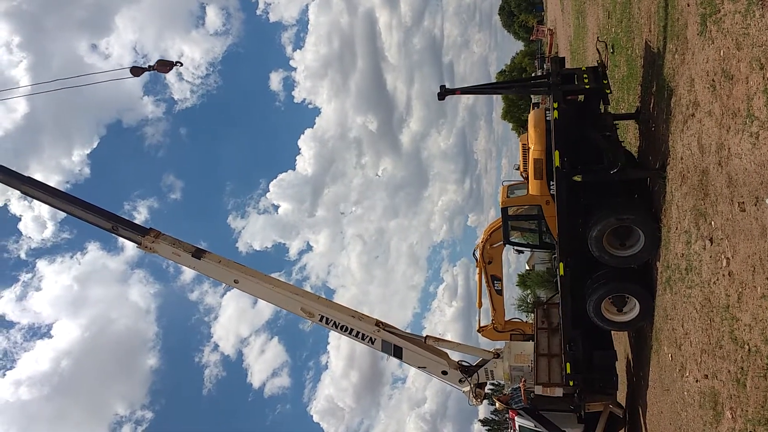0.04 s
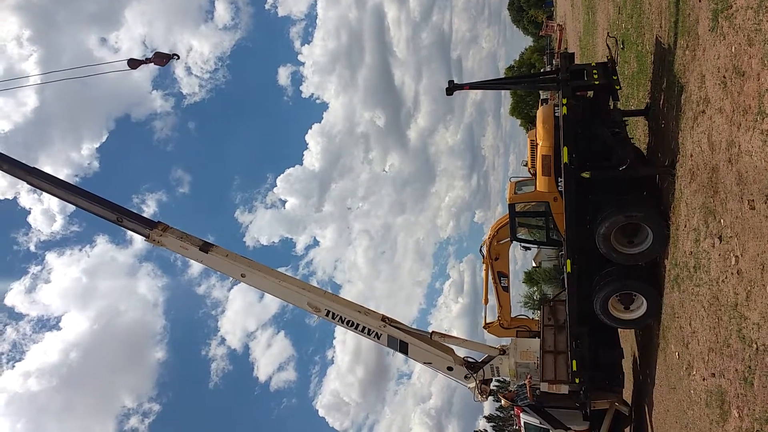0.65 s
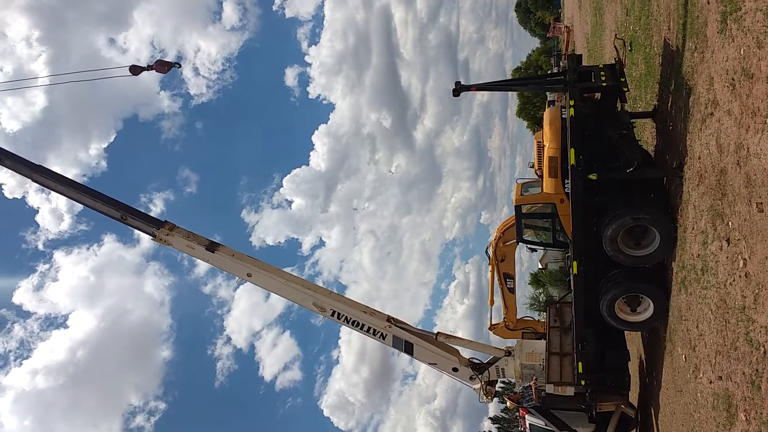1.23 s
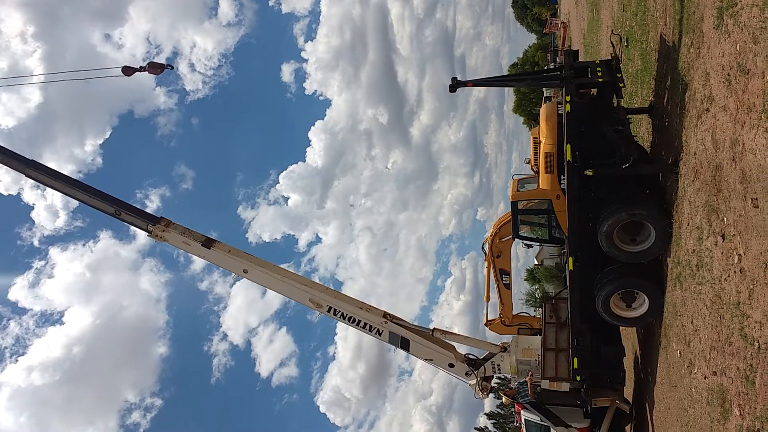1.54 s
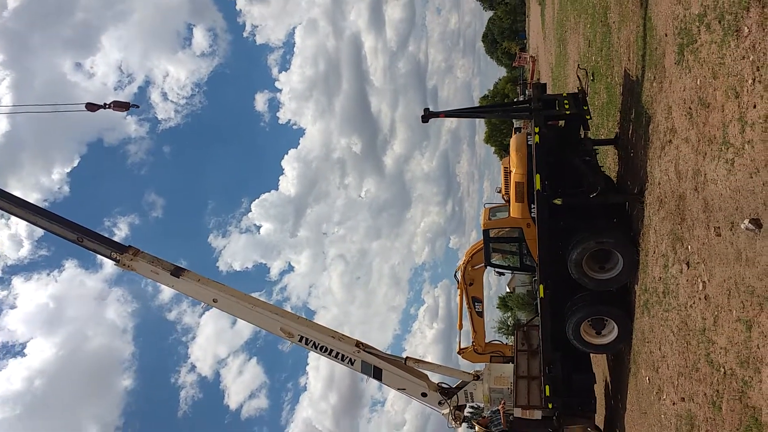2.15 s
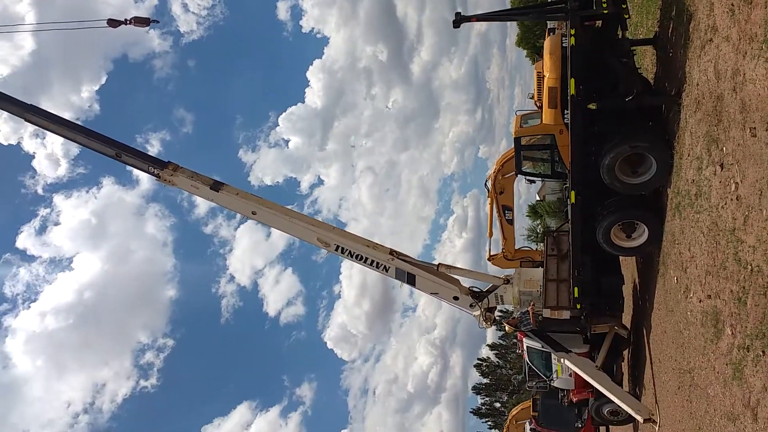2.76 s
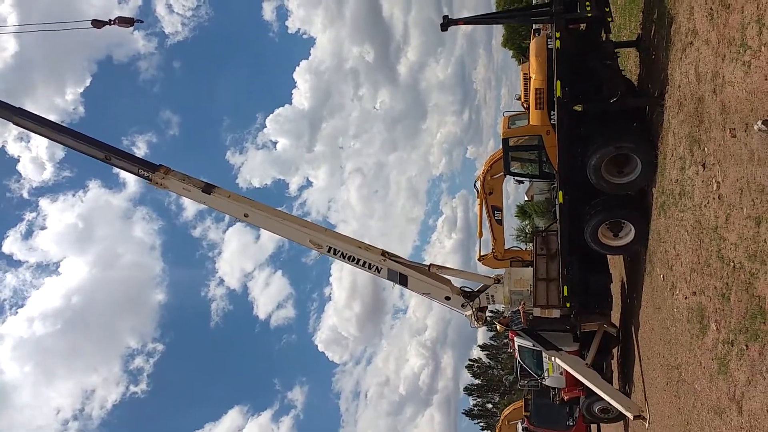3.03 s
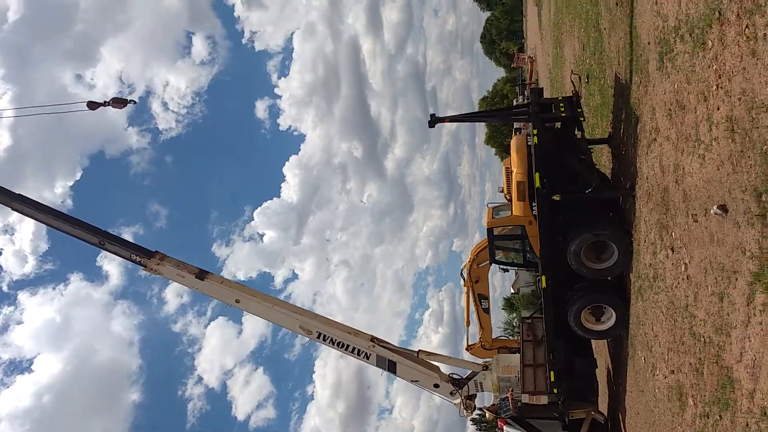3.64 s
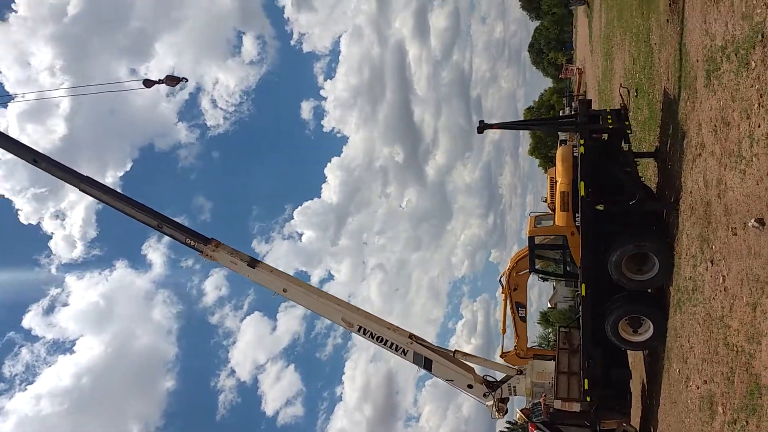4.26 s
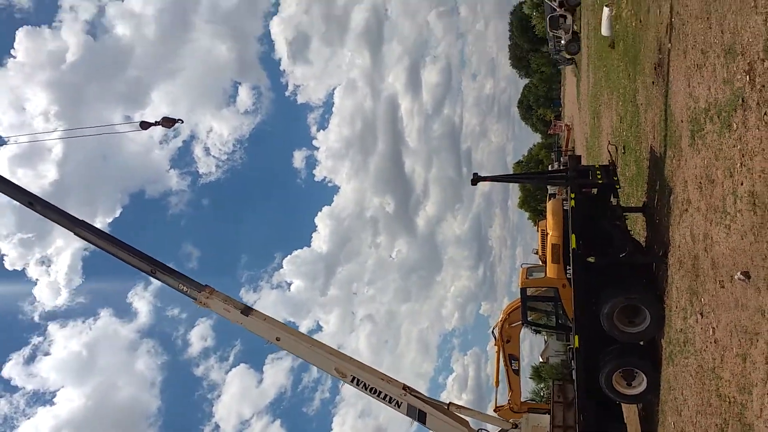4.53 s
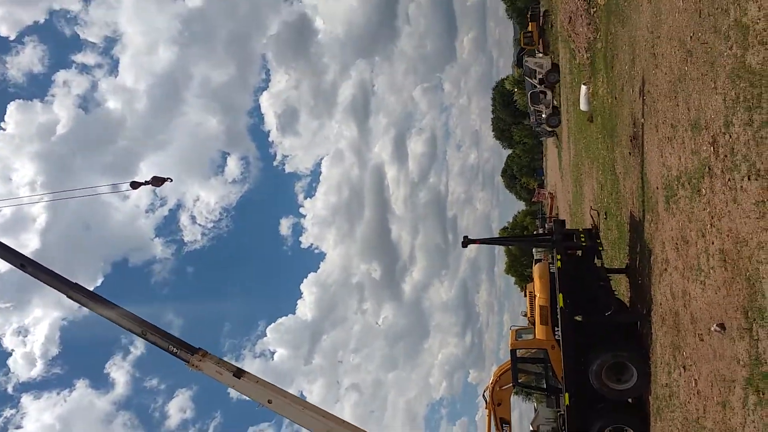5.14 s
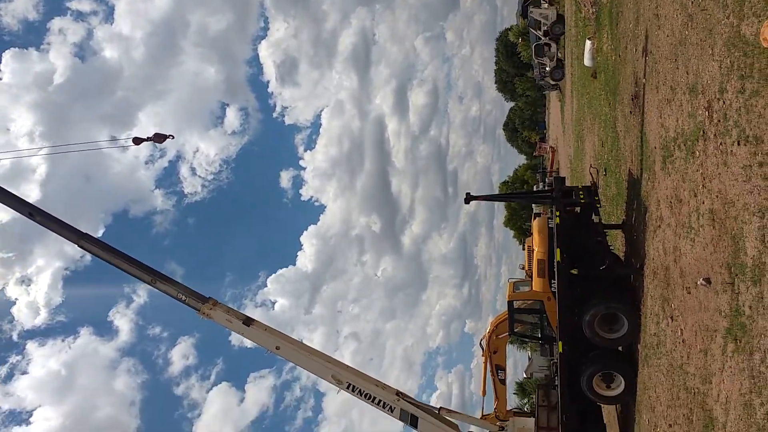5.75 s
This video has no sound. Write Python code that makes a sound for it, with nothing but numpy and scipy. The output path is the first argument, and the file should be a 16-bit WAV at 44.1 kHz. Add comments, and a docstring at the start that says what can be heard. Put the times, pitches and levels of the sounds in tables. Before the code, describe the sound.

A diesel crane truck idles outdoors with a steady rattle, a low throb and a thin pump whine. Gusts buffet the hand-held microphone, peaking after about two seconds with sharp pops, and the engine dips under the strongest ones. After four seconds a valve gives a faint, thin hiss and the hydraulic whine comes forward as the engine sags slightly. The wind keeps thumping, and one faint tick comes near the end.

```python
"""A six-cylinder diesel truck idles in a field, rattling and throbbing as it drives its crane's pump.
From the first second, gusts buffet the two ports of a hand-held microphone; the recorder's gain
control ducks the engine at each strong gust and lets it swell back. Around two seconds the microphone
turns away and the wind peaks. After four seconds a valve opens with a thin hiss, the pump takes load,
its whine comes forward and the engine sags a little. Near the end comes one faint tick."""
import sys
import numpy as np
from scipy import signal
from scipy.fft import rfft, irfft
from scipy.io import wavfile
from scipy.ndimage import uniform_filter1d, minimum_filter1d, map_coordinates

SR = 44100
rng = np.random.default_rng(int(sys.argv[2]) if len(sys.argv) > 2 else 0)


def persist_wave(psi):
    """Save psi, clipped to +-1, as 16-bit WAV."""
    counts = np.round(np.clip(psi, -1, 1) * 32767).astype(np.int16)
    wavfile.write(sys.argv[1], SR, np.atleast_2d(counts).T)


N = 255339
T, HZ = np.arange(N) / SR, np.fft.rfftfreq(N, 1 / SR)
PORT_SPAN_HZ = 2491  # the full phase shift between the ports makes one turn in this span
# how far the microphone has turned away: time_s, turn_fraction
TURN = [(0, 0.2), (.6, 0.2), (1.2, 0.24), (1.8, 0.38), (2.6, 1), (5.79, 0.98)]


def clatter(cycles, repeat_share=0.54, knock=0.67, ring_firings=0.83, flutter_db=1.18, top_hz=5400):
    """Cyclostationary noise: each firing rattles the block, and part of the rattle repeats each cycle."""
    # relative spectrum of the block: frequency_hz, before_turn_db, after_turn_db
    block_spectrum = [(30, -38, -8.5), (86, 0.5, 4), (173, 5.5, 5.5), (426, 5, -2), (507, -3, -4.5),
                      (693, -19, 0.5), (870, 0, 1.5), (994, 3, -1), (1150, 2, -4.5), (1545, -10, -5),
                      (1924, -13.5, -11), (2280, -9.5, -11), (3400, -22, -18.5), (4020, -19.5, -17),
                      (5340, -20, -21.5)]
    # injector fizz on the same scale: frequency_hz, level_db
    fizz_spectrum = [(3500, -60), (5300, -30), (6400, -28), (10000, -38), (15000, -47.5)]
    one_cycle = rng.standard_normal(4900)
    position = cycles % 1 * len(one_cycle)
    periodic = unit_rms(map_coordinates(one_cycle, [position], order=3, mode="grid-wrap"))
    rattle = np.sqrt(repeat_share) * periodic + np.sqrt(1 - repeat_share) * rng.standard_normal(N)
    since_firing = cycles * 6 % 1
    knocks = 1 + knock * np.exp(-since_firing / ring_firings)
    drive = rfft(rattle * knocks * gain_of(flutter_db * drift(16.6)))
    fizz = gain_of(over_frequency(fizz_spectrum))
    blocks = (gain_of(over_frequency(block_spectrum, col)) / (1 + (HZ / top_hz) ** 8) for col in (1, 2))
    before, after = (unit_rms(irfft(drive * np.hypot(block, fizz), N)) for block in blocks)
    turn = over_time(TURN)
    return band_swells((1 - turn) * before + turn * after)


def band_swells(x):
    """Slow amplitude modulation of two bands: the clatter's rasp and hiss each grow and fade."""
    # the rasp band and the hiss band: centre_hz, width_octaves
    bands = [(1120, 0.81), (4200, 1)]
    # their gains: time_s, rasp_db, hiss_db
    swells = [(0, 1.5, 2.5), (.48, 0.5, 1), (.63, 4, 1.5), (.8, -1.5, 1), (.94, 3, 2.5), (1.3, 1.5, 2.5),
              (1.8, 2.5, 2), (2.4, -0.5, -0.5), (2.9, 0, 0), (3.25, 2, -1), (3.65, 3, 0), (3.9, 0, -2.5),
              (4.45, 1, 1), (5.2, 0, -1), (5.79, -0.5, 1.5)]
    offsets = (np.log2((HZ + 1) / hz) / width for hz, width in bands)
    rasp, hiss = (irfft(rfft(x) * np.exp(-offset ** 2), N) for offset in offsets)
    return x + (gain_of(over_time(swells)) - 1) * rasp + (gain_of(over_time(swells, 2)) - 1) * hiss


def exhaust_throb(cycles, waver_db=4.5):
    """Six exhaust pulses a cycle give harmonics of the firing rate, which swell and fade together."""
    # exhaust harmonics: cycle_multiple, relative_db
    harmonics = [(6, -9), (12, -17), (24, -42), (42, -24), (48, -29)]
    # swell of the whole hum: time_s, gain_db
    swell = [(0, 4), (1.2, -7.5), (1.6, 0), (2.6, -7), (3.0, 2.5), (3.5, 7), (3.8, 4.5), (5.2, -5),
             (5.79, 1)]
    hum = np.zeros(N)
    for multiple, db in harmonics:
        level = gain_of(db + waver_db * drift(0.57))
        hum += level * np.cos(2 * np.pi * (multiple * cycles + rng.random()))
    return np.sqrt(2) * gain_of(over_time(swell)) * hum


def pump_whine(cycles, load, waver_db=3.0, waver_hz=6, jitter_hz=20.4):
    """Gear teeth and pump strokes sound at multiples of the cycle rate; backlash jitters their phase."""
    # gear and pump tones: cycle_multiple, unloaded_db, loaded_db, turn_change_db, jitter_rad
    tones = [(88, -20, -13, 0, .75), (105, -15, -22, -1, .6), (117, -16, -19, -5, .5),
             (141, -23, -23, 0, .6), (153, -22.5, -27, 0, .5), (168, -45, -14, 0, .55),
             (174, -38, -20, 0, .5), (176, -18, -22, 1, .18), (178, -27, -32, 0, .4),
             (232, -31, -36, -4, .4), (252, -33, -37, -4, .5), (385, -33.5, -42, -4, .4),
             (420, -35, -44, 1, .35), (451, -30.5, -33, -2.5, .35)]
    whine, turn = np.zeros(N), over_time(TURN)
    for multiple, unloaded_db, loaded_db, turn_db, jitter in tones:
        level = (1 - load) * gain_of(unloaded_db) + load * gain_of(loaded_db)
        level *= gain_of(turn_db * turn + waver_db * drift(waver_hz))
        phase = 2 * np.pi * (multiple * cycles + rng.random()) + jitter * drift(jitter_hz)
        whine += level * np.cos(phase)
    return np.sqrt(2) * whine


def valve_flow(load):
    """Oil rushing through the valve excites three broad resonances, in proportion to the load."""
    # valve resonances: centre_hz, width_hz, relative_db
    resonances = [(607, 65, -12.5), (786, 49, -10.5), (1453, 95, -16)]
    noise, flow = rfft(rng.standard_normal(N)), np.zeros(N)
    for hz, width_hz, db in resonances:
        detuning = (HZ - hz) / width_hz
        flow += gain_of(db) * unit_rms(irfft(noise / (1 + 2j * detuning) / (1 + 1j * detuning), N))
    return load * flow


def valve_opening(rise_s=.04, sag_hz_per_s=270):
    """Narrow-band flow noise: oil squeezes through the opening gap with a hiss that sinks and fades."""
    # the hiss of the gap: start_s, decay_s, relative_db, pitch_hz, width_hz
    hiss = (4.19, .5, -25.5, 3210, 140)
    start_s, decay_s, db, pitch_hz, width_hz = hiss
    age = np.maximum(T - start_s, 0)
    envelope = np.minimum(age / rise_s, 1) * np.exp(-age / decay_s)
    phase = 2 * np.pi * np.cumsum(pitch_hz - sag_hz_per_s * age) / SR
    return gain_of(db) * envelope * np.sqrt(2) * drift(width_hz / 2) * np.cos(phase)


def stereo_ports(direct, scattered, stair_rad=0.3, blur=0.81):
    """Partial coherence: the ports slip in and out of phase with frequency, least alike in between."""
    # how the two ports relate: frequency_hz, coherence, phase_shift_fraction, left_over_right_db
    ports = [(50.3, 0, 0.77, 0.5), (304, 1, 0.099, -4), (482, 0.74, 0.037, 1.5), (784, 1, 0.21, -4.5),
             (1290, 0.97, 0.26, -2), (1800, 0.92, 1, -3.5), (2480, 0.96, 0.99, -0.5), (3260, 0.59, 1, -4),
             (3970, 1, 0.92, 3), (5040, 0.88, 0.98, 2), (7300, 0.98, 0.99, -0.5), (9000, 1, 0.94, 0.5),
             (15000, 1, 0.96, -2.5)]
    angle = np.pi - 2 * np.pi * HZ / PORT_SPAN_HZ
    phase = (angle - stair_rad * np.sin(2 * angle)) * over_frequency(ports, 2)
    coherence = np.clip(over_frequency(ports) * (1 - blur * np.sin(phase) ** 2), 0, 1)
    mid = rfft(direct) * np.sqrt((1 + coherence) / 2)
    side = rfft(scattered) * np.sqrt((1 - coherence) / 2)
    lean = gain_of(over_frequency(ports, 3) / 2)
    return irfft(np.array([(mid + side) * lean, (mid - side) / lean * np.exp(1j * phase)]), N)


def wind(one_port=0.93, lump_hz=42, eddy_hz=110, lean_db=0.35):
    """Turbulent pressure, mostly at one port, rides on the gusts and shares out their energy in lumps."""
    strength, edge_hz = airflow()
    lumps, eddies = drift(lump_hz), drift(eddy_hz)
    shared, independent = (buffeting(lumps, eddies, edge_hz) for _ in range(2))
    opposed = one_port * shared + np.sqrt(1 - one_port ** 2) * independent
    pair = strength * wind_pickup(shared, opposed)
    # over about 45 ms the power follows that of the airflow
    target_power = signal.oaconvolve(strength ** 2, np.hanning(2000), "same")
    lumpy_power = signal.oaconvolve((pair ** 2).mean(0), np.hanning(2000), "same")
    return pair * np.sqrt(target_power / lumpy_power) * gain_of([[-lean_db], [lean_db]])


def airflow(breeze_edge_hz=236, puff_db=1.5, puff_hz=6.9, rise_db_per_s=708, fall_db_per_s=606):
    """Breeze and gusts add in power; gives the wind's amplitude and its power-weighted upper edge."""
    # the breeze between gusts: time_s, level_db
    breeze = [(0, -39), (.9, -33.5), (1.6, -14.5), (2.3, -10), (2.8, -20.5), (3.3, -18.5), (3.7, -18),
              (4.45, -29), (5.2, -24), (5.79, -24.5)]
    # gusts that hit the microphone: start_s, length_s, level_db, upper_edge_hz
    gusts = [(0.19, 0.021, -20.5, 250), (0.255, 0.021, -13, 282), (0.372, .02, -33, 250),
             (.47, 0.03, -40, 250), (0.676, 0.027, -20, 263), (0.955, 0.048, -10, 257),
             (1.184, 0.03, -8, 260), (1.254, 0.0081, -9.5, 394), (1.284, 0.047, -5, 191),
             (1.39, 0.081, -10, 228), (1.506, 0.0043, 1, 221), (1.721, 0.032, -6.5, 297.7),
             (1.855, 0.23, -7, 283), (1.903, 0.012, -2, 255), (2.052, 0.1, -5.5, 630),
             (2.19, 0.01, -4, 660), (2.21, 0.12, -12, 590), (2.26, 0.011, -4.5, 290),
             (2.409, 0.039, 0.5, 485), (2.432, 0.061, -1.5, 570), (2.608, 0.0059, 0, 262),
             (3.002, 0.012, -9.5, 220), (3.032, 0.037, -9.5, 325), (3.197, 0.012, -12.5, 265),
             (3.306, 0.025, -14, 230), (3.713, 0.071, -6.5, 237.5), (3.744, 0.018, -2, 240),
             (3.85, 0.015, -7.5, 265), (3.92, 0.025, -7.5, 250), (4.0, 0.06, -8.5, 250),
             (4.092, 0.071, -3, 286), (4.249, 0.012, -3.5, 228), (4.638, 0.085, -3.5, 201),
             (4.772, 0.096, -7.5, 260), (4.874, 0.068, -4, 325), (4.948, 0.042, -4, 230),
             (5.021, 0.015, -3, 258), (5.153, 0.018, -7.5, 385), (5.197, 0.052, -14.5, 280),
             (5.378, 0.018, -14, 270)]
    power = gain_of(over_time(breeze) + puff_db * drift(puff_hz)) ** 2
    weighted_edge = power * breeze_edge_hz
    for start_s, length_s, db, edge_hz in gusts:
        near = slice(*np.searchsorted(T, [start_s - .1, start_s + length_s + .1]))
        t = T[near] - start_s
        build_db = np.clip(t / length_s, 0, 1) - .5  # a gust gains 1 dB from start to end
        flanks_db = rise_db_per_s * np.maximum(-t, 0) + fall_db_per_s * np.maximum(t - length_s, 0)
        gust_power = gain_of(db + build_db - flanks_db) ** 2
        power[near] += gust_power
        weighted_edge[near] += gust_power * edge_hz
    return np.sqrt(power), weighted_edge / power


def buffeting(lumps, eddies, edge_hz, lumpy_db=3.0, eddy_db=3.5, slope=2.9, brighten_octaves=0.092):
    """Turbulence as low-pass noise: fast air is brighter and breaks up into separate small eddies."""
    edge_octave = np.log2(edge_hz)
    fast = np.clip(edge_octave - np.log2(250), 0, 1.3)
    cutoff_octave = edge_octave + brighten_octaves * (lumps + fast * eddies)
    noise, air = rfft(rng.standard_normal(N)), np.zeros(N)
    for octave in range(6, 12):  # crossfade between cutoffs from 64 to 2048 Hz
        weight = np.maximum(1 - abs(cutoff_octave - octave), 0)
        air += weight * irfft(noise / np.hypot(1, (HZ / 2 ** octave) ** slope), N)
    return unit_rms(air * gain_of(lumpy_db * 2 * np.tanh(lumps / 2) + eddy_db * fast * np.tanh(eddies)))


def eddy_slaps(width=0.88, rounding_s=.00022):
    """Pressure transients: a passing eddy swings the air to and fro; small ones snap, large ones thud."""
    # single eddies ahead of the pickup: time_s, peak_db, pitch_hz, decay_s
    slaps = [(0.9764, -14, 403, 0.0013), (1.1807, -9, 403, 0.001), (1.2599, -1, 540, 0.00055),
             (1.2712, -7, 400, .0008), (1.2783, 1.5, 354, 0.0011), (1.292, -17, 142, 0.0025),
             (1.515, -2.5, 240, 0.0012), (1.8993, -2.5, 414, 0.00022), (1.9625, 0.5, 450, 0.00037),
             (2.009, -5, 650, 0.0007), (2.0565, 3.5, 500, 0.0011), (2.0728, 0.5, 830, 0.00017),
             (2.081, -1, 530, 0.00042), (2.132, -1.5, 890, 0.00057), (2.189, 3, 400, 0.00035),
             (2.1997, -1, 530, 0.0011), (2.220, 0, 644, .0012), (2.271, 4.5, 510, 0.00035),
             (2.405, 0, 387, 0.00057), (2.411, 1.5, 356, 0.0011), (2.4232, -5, 516, 0.001),
             (2.4368, 17, 520, 0.0005), (2.4504, 7, 830, 0.00034), (2.4645, 1, 740, 0.0011),
             (2.4802, 5.5, 850, 0.00031), (2.4891, 7.5, 740, 0.00044), (3.048, -9, 380, .0014),
             (3.058, -10, 270, .002), (3.604, -10, 600, 0.0005), (3.654, -9, 300, 0.0012),
             (3.715, -10, 363, 0.00061), (3.7545, 1.5, 223, 0.0025), (3.7702, -1, 440, 0.00049),
             (3.860, -1.5, 380, 0.0009), (4.1032, -1.5, 564, 0.0016), (4.1202, -2, 270, 0.00065),
             (4.1418, 6, 280, 0.0018), (4.640, -5, 420, 0.0008), (4.8868, -3, 240, 0.0017),
             (4.896, -2.5, 303, 0.0018), (4.9325, -1, 250, 0.003), (5.0353, 0, 272, 0.0011),
             (5.368, -11, 259, .002)]
    pressure = np.zeros(N)
    for time_s, db, pitch_hz, decay_s in slaps:
        near = slice(*np.searchsorted(T, [time_s - .04, time_s + .04]))
        t = T[near] - time_s
        swing = np.sin(2 * np.pi * pitch_hz * t) * np.exp(-np.hypot(t, rounding_s) / decay_s)
        pressure[near] += gain_of(db) * swing / abs(swing).max()
    return wind_pickup(pressure, width * pressure)


def wind_pickup(shared, opposed):
    """Mid-side pickup lifts the bass that differs between the ports, so wind sounds very wide."""
    # response to wind: frequency_hz, shared_db, opposed_db
    response = [(20.1, -31, -7), (40, -26, -10), (78.4, -12, 7.5), (123, -4.5, 13), (198, -5.5, 4),
                (352, -7, -0.5), (690, -6, -6), (1230, 1, -16), (4000, 2, -4)]
    port_comb = abs(np.cos(np.pi / 2 * HZ / PORT_SPAN_HZ))
    mid = irfft(rfft(shared) * gain_of(over_frequency(response)) * port_comb, N)
    side = irfft(rfft(opposed) * gain_of(over_frequency(response, 2)) * -1j, N)  # a quarter cycle late
    return np.array([mid + side, mid - side])


def tick(decay_s=.0007):
    """A band-passed noise burst with a fast exponential decay is heard as a faint dry tick."""
    # the burst ahead of its filter: start_s, level_db, centre_hz
    event = (5.2662, -31, 9000)
    start_s, db, centre_hz = event
    burst = rng.standard_normal(N) * (T >= start_s) * np.exp(-abs(T - start_s) / decay_s)
    return gain_of(db) * irfft(rfft(burst) / (1 + np.log2((HZ + 1) / centre_hz) ** 2) ** 3, N)


def gain_of(db):
    """Decibels as an amplitude ratio."""
    return 10 ** (np.asarray(db) / 20)


def unit_rms(x):
    """Normalisation to an rms of one."""
    return x / np.sqrt(np.mean(x ** 2) + 1e-20)


def over_time(rows, column=1):
    """Linear interpolation of a table column at every sample."""
    rows = np.array(rows, float)
    return np.interp(T, rows[:, 0], rows[:, column])


def over_frequency(rows, column=1):
    """Interpolation of a table column at every bin, on a logarithmic frequency axis."""
    rows = np.array(rows, float)
    return np.interp(np.log(HZ + 1), np.log(rows[:, 0]), rows[:, column])


def drift(hz):
    """Random fluctuation of unit rms, low-passed at hz."""
    return unit_rms(irfft(rfft(rng.standard_normal(N)) / (1 + (HZ / hz) ** 4), N))


def lagged(x, time_constant_s):
    """First-order lag: the output approaches x exponentially."""
    pole = np.exp(-1 / (time_constant_s * SR))
    return signal.lfilter([1 - pole], [1, -pole], x)


def gain_control(x, ceiling_db=-14, recover_db_per_s=7.5, sense_s=0.02, attack_s=0.00043):
    """Compression with fast attack and slow release: the engine ducks at a strong gust and swells back."""
    power_db = 10 * np.log10(lagged((x ** 2).mean(0), sense_s) + 1e-12)
    excess_db = np.maximum(power_db - ceiling_db, 0)
    recovery_db = recover_db_per_s * T
    cut_db = np.maximum.accumulate(excess_db + recovery_db) - recovery_db
    return x * gain_of(-lagged(cut_db, attack_s))


def scene(clatter_db=-1.5):
    """Superposition at the microphone: the machine's direct and scattered sound, wind and one tick."""
    # four-stroke cycle rate of the engine: time_s, rate_hz
    speed = [(0, 8.96), (1, 8.96), (2, 8.95), (3, 8.94), (4, 8.90), (4.7, 8.887), (5.8, 8.868)]
    # the crane takes up its work: time_s, load_fraction
    pump_load = [(0, 0.24), (1.8, 0.13), (2.6, 0.22), (4.3, 0.32), (4.8, 0.75), (5.3, 0.95), (5.79, 0.97)]
    # the machine's level shifts as the microphone is moved about: time_s, gain_db
    machine_gain = [(0, -27), (.6, -24), (1.2, -24), (1.8, -25), (2.6, -22.5), (3.6, -22), (4.0, -21),
                    (4.5, -25.5), (5.1, -22), (5.79, -22)]
    cycles, load = np.cumsum(over_time(speed)) / SR, over_time(pump_load)
    engine = gain_of(clatter_db) * clatter(cycles) + exhaust_throb(cycles)
    direct = engine + pump_whine(cycles, load) + valve_flow(load) + valve_opening()
    scattered = gain_of(clatter_db) * clatter(cycles) + valve_flow(load)
    machine = gain_of(over_time(machine_gain)) * stereo_ports(direct, scattered)
    return machine + wind() + eddy_slaps() + tick()


def record(dry, limit=1.25, band_edge_hz=15200):
    """Gain control and a fast limiter hold the buffets; the hardest slap clips; a low-pass follows."""
    ducked = gain_control(dry)
    envelope = uniform_filter1d(abs(ducked).max(0), size=44)  # 1 ms average
    allowed_gain = np.minimum(1, limit / (envelope + 1e-9))
    limiter_gain = uniform_filter1d(minimum_filter1d(allowed_gain, size=200), size=200)
    clipped = np.clip(ducked * limiter_gain, -1, 1)
    low_pass = signal.firwin(511, band_edge_hz, window=("kaiser", 9), fs=SR)
    return signal.oaconvolve(clipped, low_pass[None], "same")


dry = scene()
out = record(dry)
persist_wave(out)
```